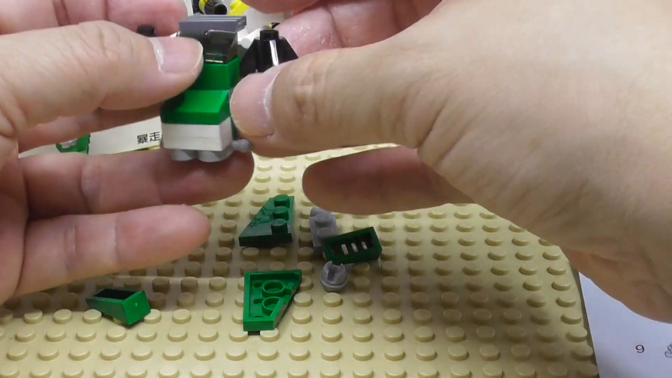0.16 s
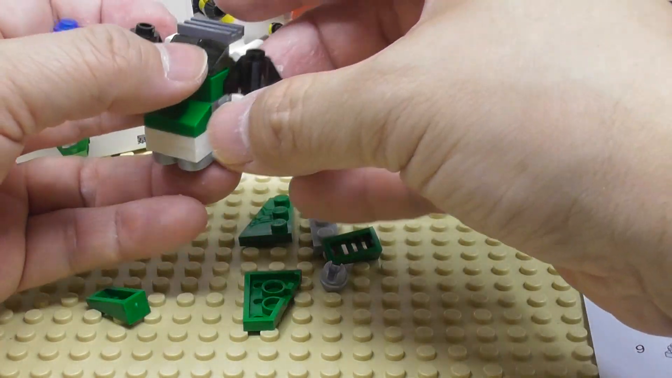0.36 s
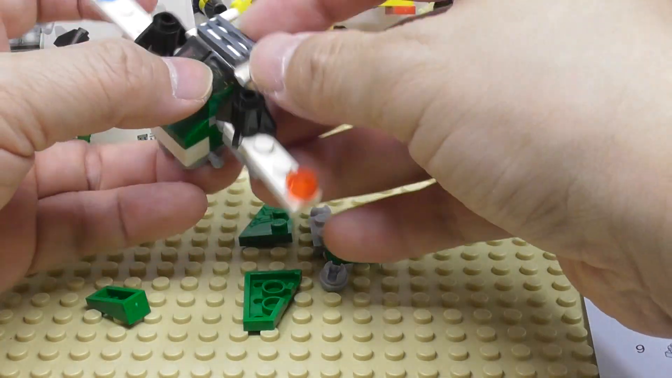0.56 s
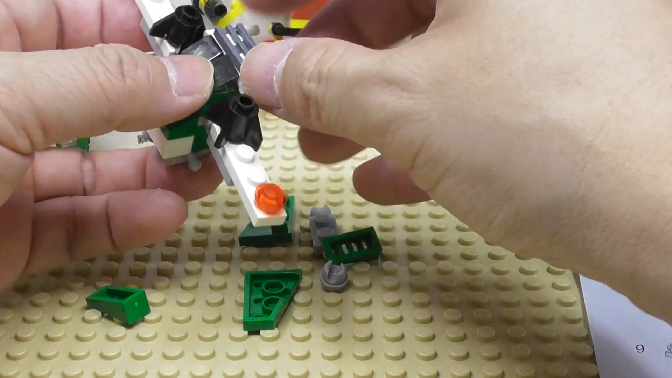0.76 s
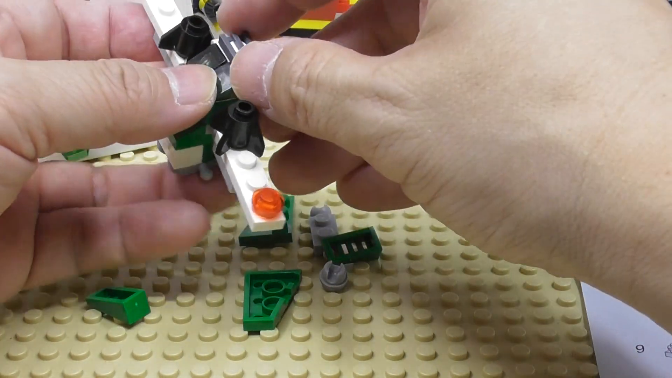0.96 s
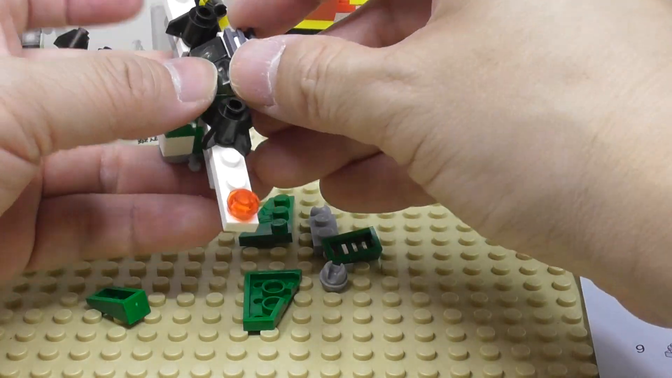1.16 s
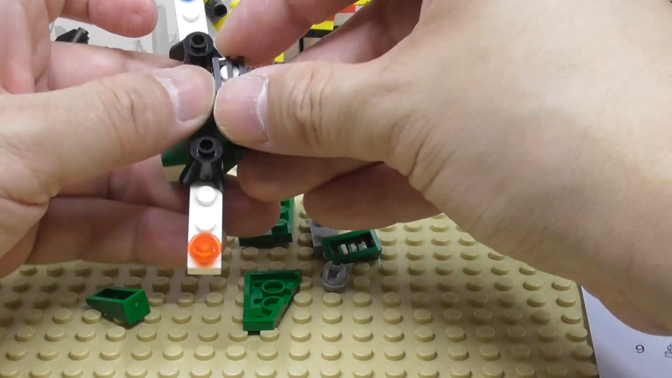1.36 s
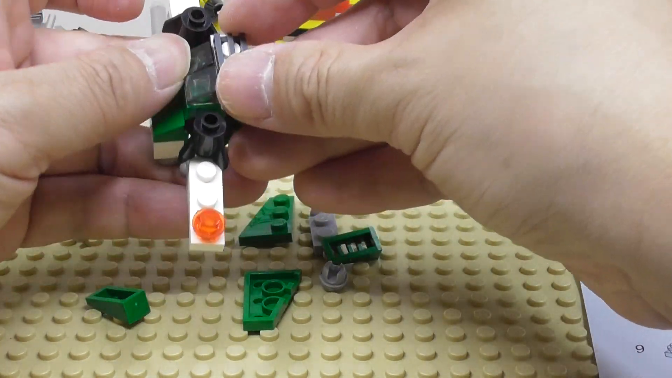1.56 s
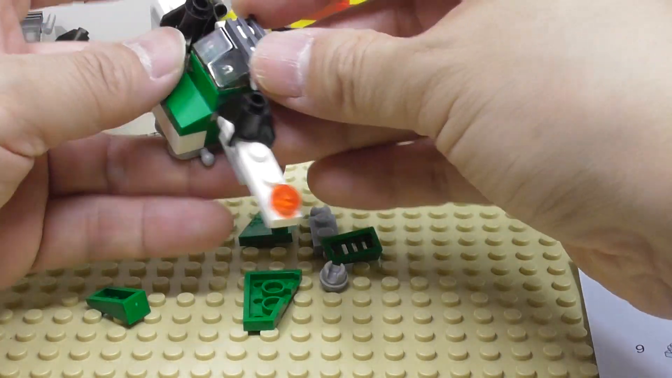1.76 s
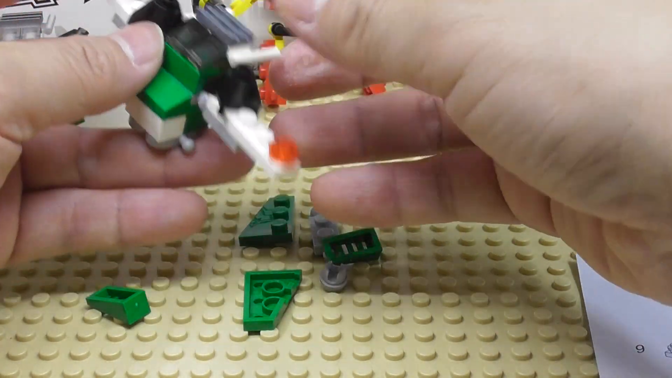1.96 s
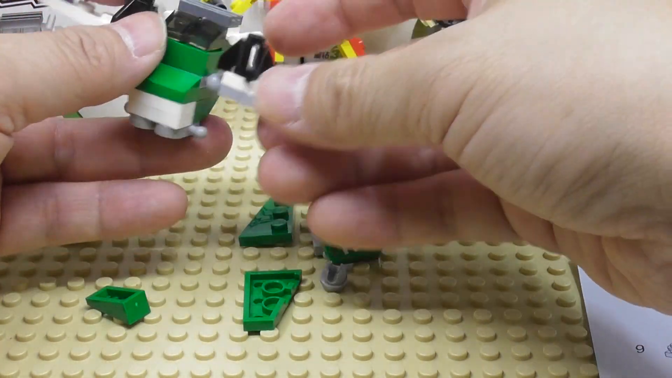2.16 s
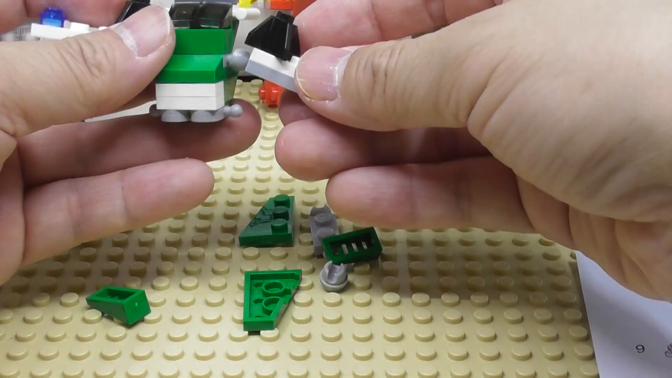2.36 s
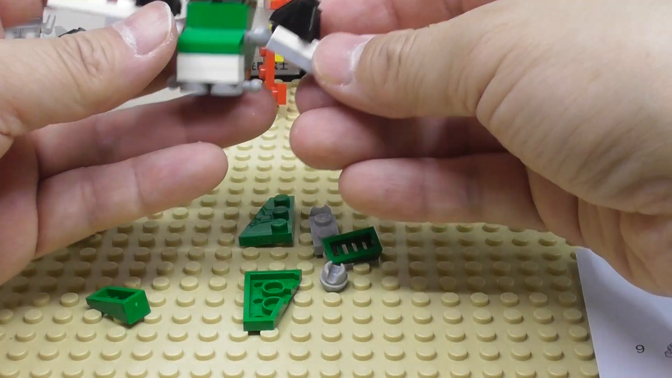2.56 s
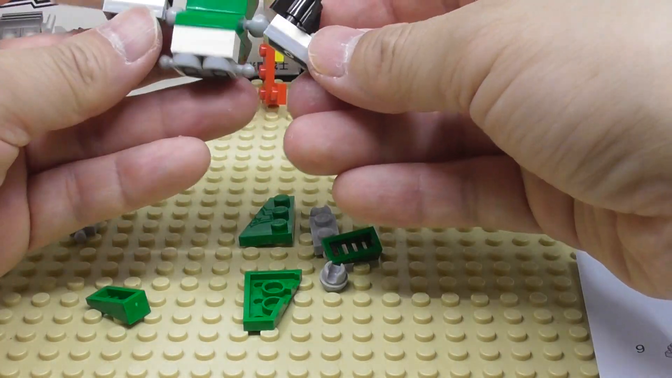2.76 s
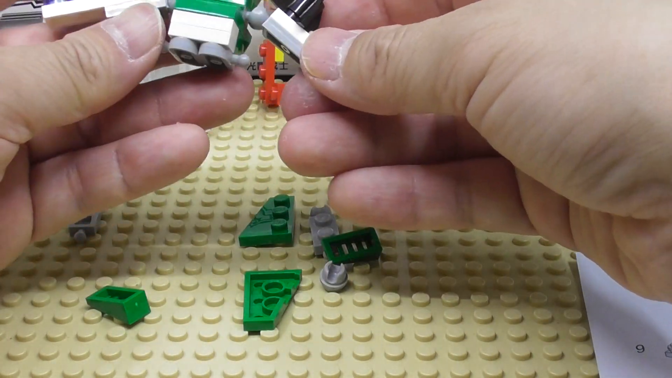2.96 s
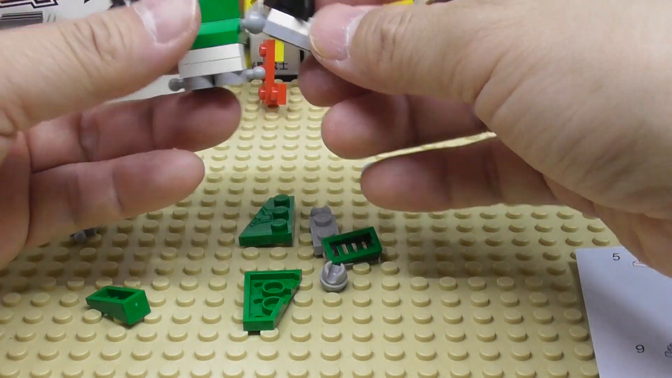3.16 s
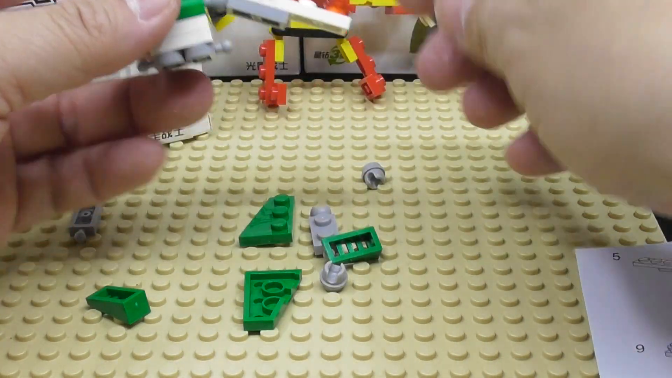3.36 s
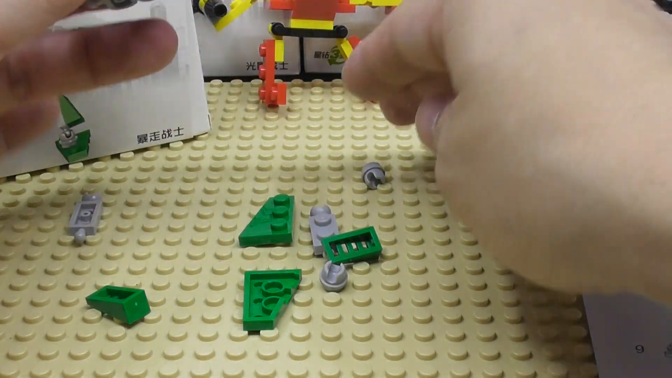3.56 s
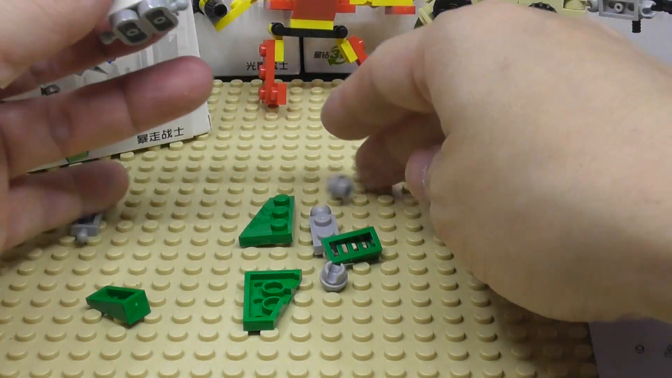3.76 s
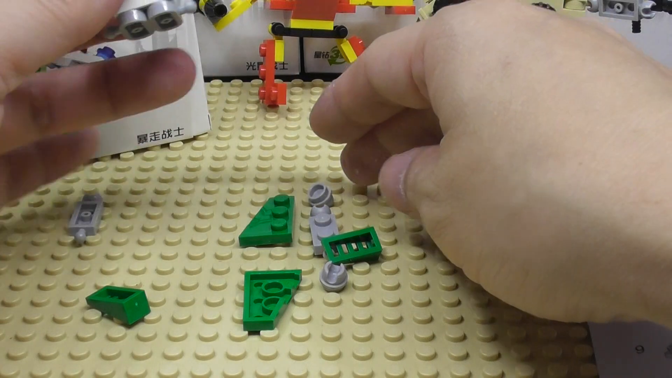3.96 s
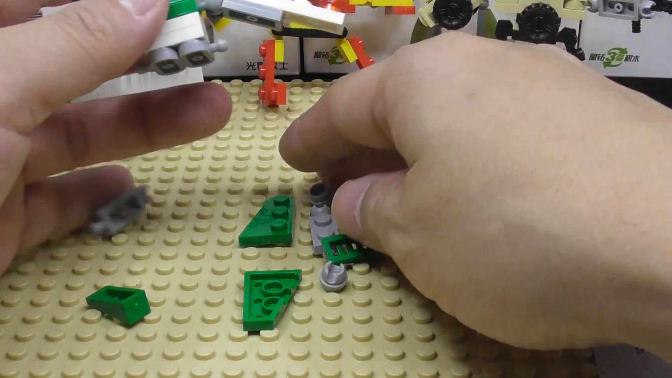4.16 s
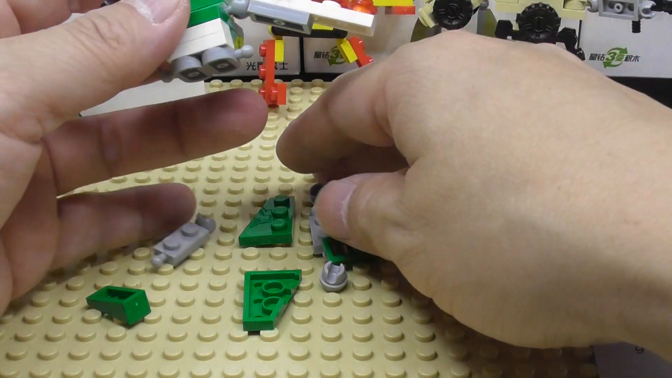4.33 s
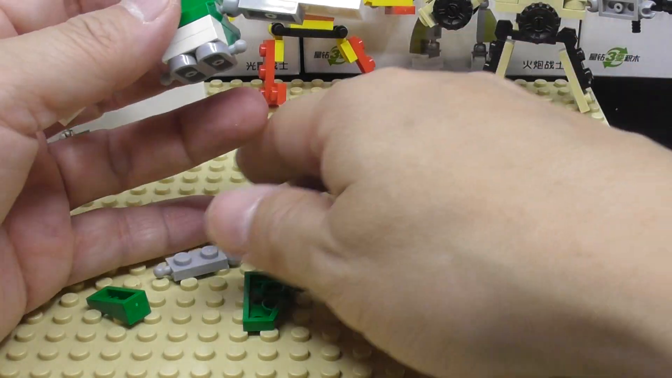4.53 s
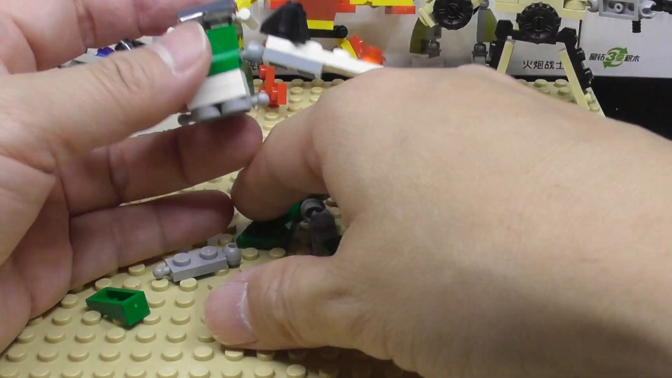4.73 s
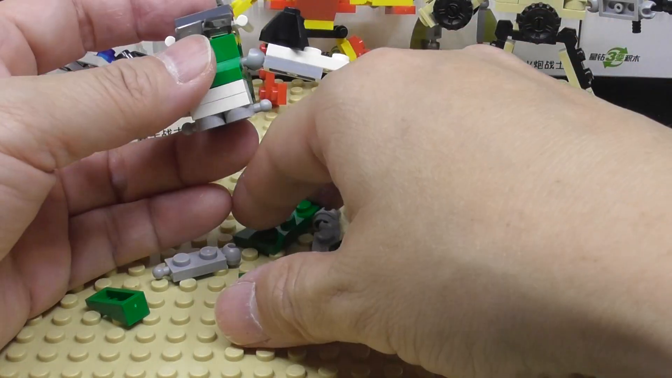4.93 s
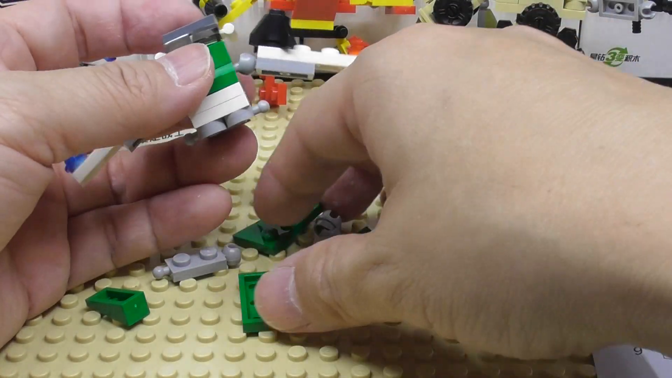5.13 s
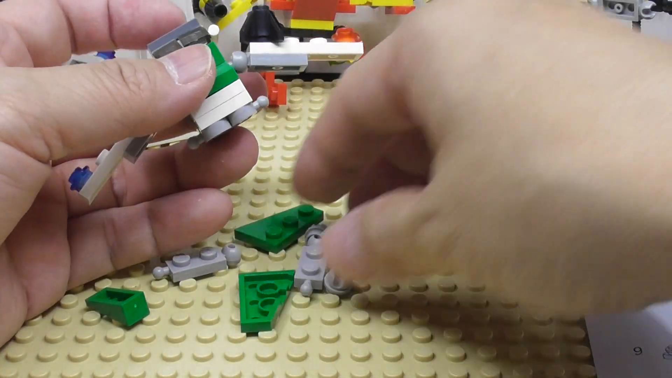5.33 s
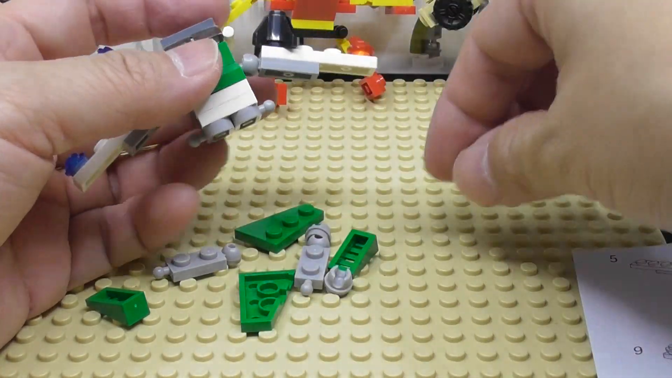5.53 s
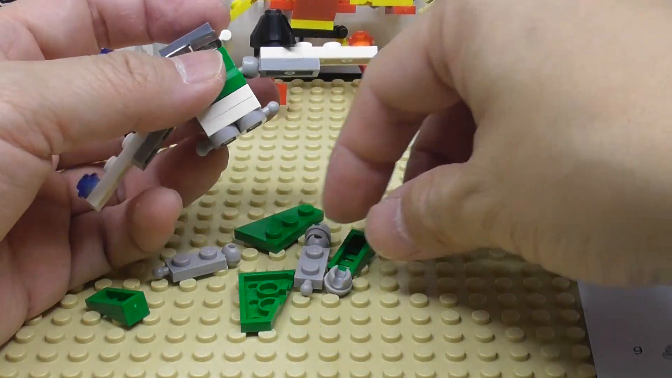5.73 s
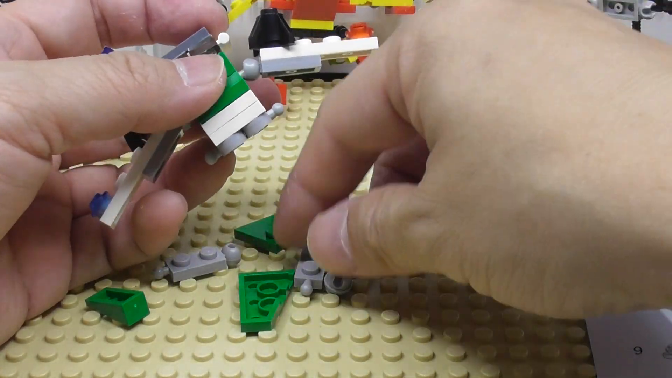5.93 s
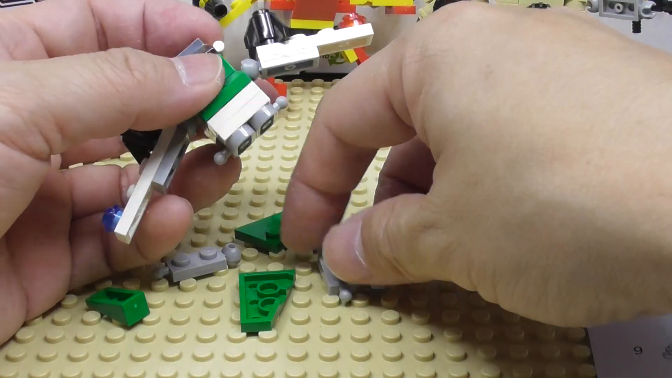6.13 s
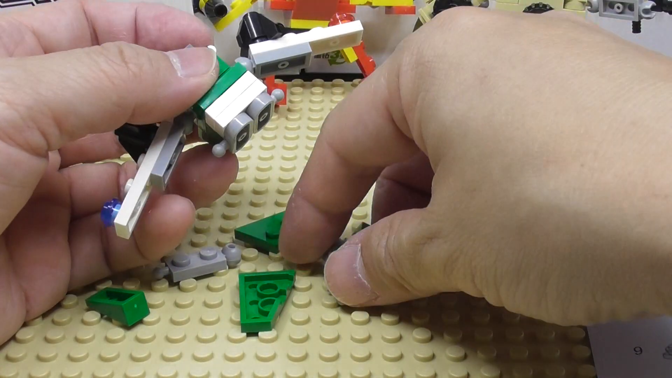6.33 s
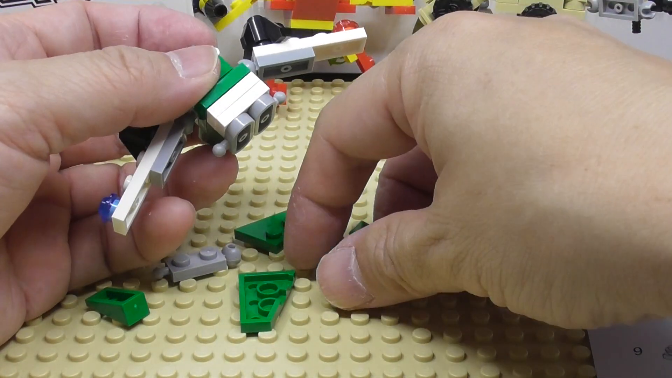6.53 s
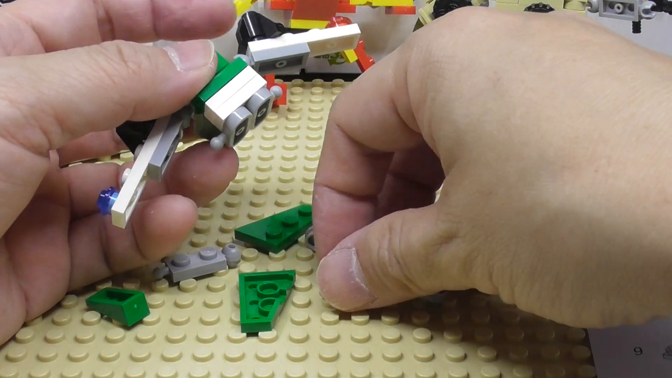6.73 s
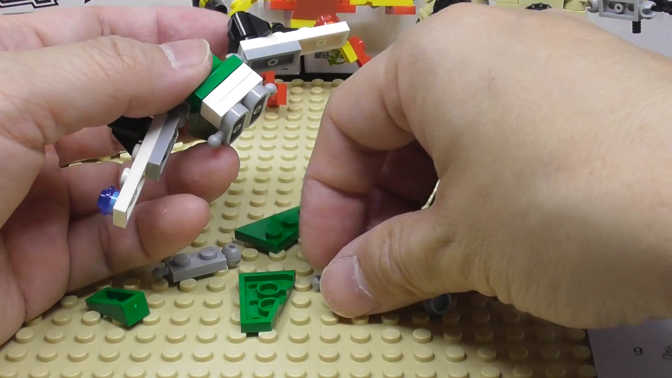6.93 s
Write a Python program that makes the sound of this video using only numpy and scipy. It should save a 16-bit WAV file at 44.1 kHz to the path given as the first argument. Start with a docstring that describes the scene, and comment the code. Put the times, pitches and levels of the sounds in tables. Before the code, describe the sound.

Close, dry plastic clatter in bursts after a quiet stretch of soft handling, with a low wavering fan hum and faint hiss behind.

```python
"""A quiet room, close to a studded base plate: small plastic bricks are handled, then pushed about on the plate.
Each contact is a sum of decaying modes of brick and plate, with noise tails scattered by objects nearby.
A hollow piece sings on three modes, hard knocks add low pressure pulses, and rustle is dense modal slips.
A fan hums steadily behind: wavering tones on its turn rate over shaped air noise, with a faint hiss."""
import sys
import numpy as np
from scipy import signal
from scipy.fft import rfft, irfft, next_fast_len
from scipy.io import wavfile

SR = 44100
rng = np.random.default_rng(int(sys.argv[2]) if len(sys.argv) > 2 else 0)


def waveform_to_disk(signal):
    """Save audio, clipped to [-1, 1], as 16-bit WAV at the path in sys.argv[1]."""
    frames = np.transpose(np.atleast_2d(signal))
    scaled = np.clip(frames, -1, 1) * 32767
    samples = np.round(scaled).astype(np.int16)
    wavfile.write(sys.argv[1], SR, samples)


N = 312669

# modes of a small brick and of the base plate: f/Hz, relative level/dB, t60/s
BRICK_MODES = [(6260, -6, 0.0024), (7240, 3, 0.0045), (8120, 1, 0.0062), (8960, -1.5, 0.0056),
               (9540, -1.5, 0.0041), (11300, -10, 0.0039), (12830, -11.5, 0.0038), (15000, -18, 0.0033)]
PLATE_MODES = [(1106, -6.5, 0.016), (1323, -6, 0.017), (1768, -4.5, 0.0062), (2172, -3, 0.0067),
               (2840, -9, 0.0052), (3330, -10.5, 0.0092), (3820, -4, 0.0072), (4370, -11, 0.005)]
# correlation of left and right: f/Hz, likeness (0-1)
LIKENESS = [(60, 0.48), (200, 0.92), (1300, 0.75), (2400, 0.99), (4400, 1), (8100, 0.99), (15000, 0.032)]


def amp(db):
    """Level: 20 dB is a factor of ten in pressure."""
    return 10 ** (np.asarray(db, float) / 20)


def rms_one(x):
    """Normalization: scale the mean power to 1."""
    return x / np.sqrt(np.mean(x ** 2) + 1e-20)


def at_hz(points, hz):
    """Interpolation on a logarithmic frequency axis."""
    table = np.array(points)
    return np.interp(np.log(hz + 1), np.log(table[:, 0]), table[:, 1])


def drift(rate_hz):
    """Slow random modulation: normal points of spread 1, joined by lines."""
    position = np.arange(N) / SR * rate_hz
    return np.interp(position, np.arange(400), rng.standard_normal(400))


def ring(clicks, hz, t60_s):
    """Damped resonance: a two-pole filter answers each unit click with a decaying sine."""
    radius = amp(-60 / (t60_s * SR))
    angle = 2 * np.pi * hz / SR
    poles = [1, -2 * radius * np.cos(angle), radius * radius]
    return signal.lfilter([0, np.sin(angle)], poles, clicks + 1e-18)   # the offset avoids denormal numbers


def pair(mid, side, alike):
    """Stereo correlation: the balance of sum and difference sets the likeness of the channels."""
    common, opposed = np.sqrt(1 + alike) * mid, np.sqrt(1 - alike) * side
    return np.array([common + opposed, common - opposed]) / np.sqrt(2)


def coloured(spectrum):
    """Spectral shaping: white noise weighted by frequency, in stereo, rms 1."""
    size = next_fast_len(N)
    hz = np.arange(size // 2 + 1) * SR / size
    mid, side = rfft(rng.standard_normal((2, size))) * amp(at_hz(spectrum, hz))
    stereo = irfft(pair(mid, side, at_hz(LIKENESS, hz)), size)
    return rms_one(stereo[:, :N])


def fan():
    """Rotating source: wavering harmonics of the turn rate over turbulent air noise, nearer the left."""
    # tones: multiple of the turn rate, rms level/dB before panning and waver, waver/dB
    fan_tones = [(1, -57.5, 0.37), (3, -57, 4.3), (4, -44.5, 0.18), (7, -58, 7.9), (12, -63, 1.5)]
    # air in the room's resonances: f/Hz, relative spectral level/dB
    air_spectrum = [(25, -37), (60, -20), (150, -10.5), (185, -6.5), (215, -17), (270, -20.5), (290, -6),
                    (340, -4), (400, -12), (800, -17.5), (880, -28), (1050, -20.5), (1300, -23.5),
                    (1400, -41)]
    turn_hz, air_db = 48.41, -43
    pan_db = 3.5   # left over right
    t = np.arange(N) / SR
    tones = np.zeros(N)
    for multiple, level_db, waver_db in fan_tones:
        sine = np.sqrt(2) * np.sin(2 * np.pi * (multiple * turn_hz * t + rng.random()))
        tones += amp(level_db + waver_db * drift(7.2)) * sine
    air = amp(air_db) * coloured([(10, -68)] + air_spectrum + [(2500, -77.0)])
    return (tones + air) * amp([[pan_db / 2], [-pan_db / 2]])


def hiss():
    """Broadband noise: a steady hiss, mostly above the fan's air noise in frequency."""
    # f/Hz, relative spectral level/dB
    hiss_spectrum = [(1300, -8.5), (1500, -4.5), (2500, -11), (4300, -18), (5300, -29), (6300, -24),
                     (7600, -18.5), (12000, -22.5), (16000, -23.5)]
    return amp(-57) * coloured(hiss_spectrum)


def strokes(t):
    """Amplitude envelope: each stroke swells, holds and dies away exponentially."""
    # finger strokes, later loose bricks over the plate: t/s, length/s, relative level/dB
    stroke_table = [(0, 0.076, -63.5), (0.125, 0.09, -60), (0.27, 0.48, -70.5), (0.889, 0.036, -61.5),
                    (1.006, 0.016, -58), (1.287, 0.14, -69), (1.463, 0.035, -61.5), (1.744, 0.031, -61),
                    (1.845, 0.034, -55), (2.07, 0.05, -64), (2.185, 0.022, -58), (2.835, 0.025, -71),
                    (3.033, 0.042, -73), (3.225, 0.16, -70), (3.735, 0.26, -62.5), (4.16, 0.16, -57),
                    (4.378, 0.16, -50.5), (4.679, 0.37, -60.5), (5.141, 0.18, -54.5), (6.032, 0.15, -56),
                    (6.678, 0.022, -47.5), (6.845, 0.027, -46)]
    attack_s, release_s = 0.0029, 0.022
    envelope = amp(-78.5)   # hands are never quite still
    for s, length_s, level_db in stroke_table:
        swell = np.clip((t - s) / attack_s + 1, 0, 1)
        decay = np.exp(-np.maximum(t - s - length_s, 0) / release_s)
        envelope = envelope + amp(level_db) * swell * decay
    return envelope


def slips(times, levels_db, modes, patchy_db):
    """Stick-slip excitation: each small slip drives every mode with its own strength and sign, rms 1."""
    at, out = (times * SR).astype(int), np.zeros((2, N))
    for hz, mode_db, t60_s in modes:
        clicks = np.zeros((2, N))
        push, side = rng.standard_normal((2, len(at))) * amp(levels_db + mode_db)
        clicks[:, at] = pair(push, side, at_hz(LIKENESS, hz))
        # the grip shifts, and the colour with it
        out += amp(patchy_db * drift(12)) * ring(clicks, hz, t60_s)
    return rms_one(out)


def rustle():
    """Friction: skin slips finely on bricks; later loose bricks scrape over studs in more uneven grains."""
    on_plate_s = 3.7   # from here on the plate sounds too
    skin_wobble_db, slide_wobble_db = 1, 1.5
    bright = 0.33   # radius of the double zero that lifts the treble of the brick slips
    t = np.arange(N) / SR
    times = rng.random(8000) * (N - 1) / SR
    later = times > on_plate_s
    sizes_db = np.where(later, 3.2, 1.6) * np.minimum(rng.exponential(1, 8000), 4)
    sizes_db -= np.where(later, 6.0, 0)
    on_bricks = slips(times, sizes_db, BRICK_MODES, patchy_db=5.5)
    on_bricks = rms_one(signal.lfilter([1, -2 * bright, bright ** 2], [1], on_bricks))
    on_plate = amp(12.5) * (t > on_plate_s) * slips(times, sizes_db, PLATE_MODES, patchy_db=2.5)
    wobble_db = np.where(t > on_plate_s, slide_wobble_db, skin_wobble_db) * drift(30)
    return strokes(t) * amp(wobble_db) * (on_bricks + on_plate)


def knocks():
    """Pressure pulse: each hard knock pushes the microphone with one smooth negative half-cycle."""
    # t/s, peak level/dB, length/ms
    knock_table = [(3.8138, -2, 1.24), (4.2025, -2, 1.08)]
    out = np.zeros(N)
    for s, level_db, length_ms in knock_table:
        phase = (np.arange(N) / SR - s) / (length_ms / 1000)
        out -= amp(level_db) * np.sin(np.pi * np.clip(phase, 0, 1)) ** 2
    return out


def bounced(s, level_db):
    """Repeated impact: an edge grazes, the blow lands, then the rocking brick touches twice more, losing energy."""
    graze_db = -13   # against the blow
    loss_db, loss_spread_db = 10.5, 2.0   # at each further touch
    lead_s = rng.uniform(0.00084, 0.0033, len(s))
    gaps_s = np.cumsum(rng.uniform(0.0037, 0.0083, (len(s), 2)), axis=1)
    losses_db = np.cumsum(loss_db + loss_spread_db * rng.standard_normal((len(s), 2)), axis=1)
    times = np.c_[s - lead_s, s, s[:, None] + gaps_s]
    levels_db = np.c_[level_db + graze_db, level_db, level_db[:, None] - losses_db]
    return times.ravel(), levels_db.ravel()


def blows(times, peaks_db, modes, detune, echo_db, give_s=0.00006):
    """Modal impact: unlike pieces hit at unlike spots vary in mode strength, tuning, sign and scatter."""
    strike_spread_db = 2.0   # how unevenly a blow feeds the modes
    echo_t60_s = 0.047   # scatter from table, hands and boxes close by
    t = np.arange(SR // 16) / SR
    out = np.zeros((2, N + len(t)))
    hz, mode_db, t60_s = np.transpose(modes)[:, :, None]
    alike = at_hz(LIKENESS, hz)
    chance = rng.standard_normal((len(times), 3, len(modes), 1))
    contact = 1 - np.exp(-t / give_s)   # plastic gives a little, so the force takes a moment to build
    dying = amp(-60 * t / echo_t60_s)
    tails = rng.standard_normal((len(times), 1, len(t))) * dying
    tails *= amp(echo_db) / np.sqrt(np.sum(dying ** 2))
    for s, peak_db, (strength, tuning, sign), tail in zip(times, peaks_db, chance, tails):
        decay = amp(mode_db + strike_spread_db * strength - 60 * t / t60_s) * np.sign(sign)
        rings = decay * contact * np.exp(2j * np.pi * hz * (1 + detune * tuning) * t)
        # where likeness is below 1, the right channel leads a little in phase and is a little weaker
        both = pair(rings.imag, 0.28 * rings.imag - rings.real, alike).sum(axis=1)
        both = amp(peak_db) * both / np.abs(both.mean(axis=0)).max()
        echo = signal.fftconvolve(both, tail, axes=1)[:, :len(t)]
        start = int(s * SR)
        out[:, start:start + len(t)] += both + echo
    return out[:, :N]


def contacts():
    """Coupled impact: a contact cracks the brick, drums the plate and bounces; a tumbling hollow piece sings."""
    # brick contacts: t/s, brick peak level/dB before echo and filtering, plate level/dB against the brick
    contact_table = [(0.047, -45.5, 11.5), (0.91, -33, -15), (1.517, -38, 2.5), (1.5264, -20, -8.5),
                     (3.743, -24, -0.5), (3.7605, -29.5, 8), (3.7863, -31, 3), (3.808, -16, -7),
                     (3.813, -8, -5.5), (3.844, -15.5, -3.5), (3.8718, -22.5, 3.5), (3.8827, -21, -1.5),
                     (3.8917, -23.5, -2), (3.9, -30, -2), (3.912, -30, -1), (3.946, -33.5, 6),
                     (3.9842, -29.5, 4.5), (4.1416, -26.5, 5), (4.165, -11.5, 0), (4.172, -18.5, 2),
                     (4.1951, -19.5, 5.5), (4.2018, -12.5, 2), (4.2328, -16.5, -4), (4.239, -22.5, 7),
                     (4.2582, -26.5, -1), (4.2714, -31, 10), (4.2741, -6.5, -6), (4.298, -30, 6),
                     (4.312, -15, -2), (4.344, -16, 0), (4.3535, -19, 1.5), (4.358, -21, 7),
                     (4.379, -14.5, -0.5), (4.384, -28, 5), (4.396, -34, 11), (4.4228, -34, 6.5),
                     (4.4314, -32.5, 12), (4.4505, -21, 2), (4.455, -27, 4.5), (4.466, -38, 10),
                     (4.478, -36, 16), (4.49, -25.5, 7.5), (4.5032, -29, 10), (4.5177, -27.5, 6),
                     (4.526, -29, 5), (4.588, -25, 2), (4.6937, -38.5, 8.5), (4.7141, -38.5, 12.5),
                     (4.744, -30, 5.5), (4.7528, -27.5, 2), (4.759, -31, 6.5), (4.827, -36, 9),
                     (4.8349, -22.5, 3.5), (4.84, -22.5, 4.5), (4.903, -28.5, 2.5), (4.925, -31.5, 5),
                     (4.9847, -37.5, 8), (5.175, -35, -8), (5.229, -36, 14), (5.2384, -18, -3),
                     (5.247, -7.5, -6), (5.262, -15, -5), (5.2746, -17, -11), (5.3044, -20.5, -0.5),
                     (5.316, -25.5, 2.5), (6.0007, -29, 5.5), (6.0407, -31, -17), (6.0612, -36, -14),
                     (6.073, -24, -8), (6.078, -15, -10), (6.0856, -11.5, -7), (6.113, -26, -1),
                     (6.13, -22.5, 3), (6.137, -28, 4), (6.163, -27, 5), (6.173, -29.5, -2),
                     (6.199, -41, 5), (6.2242, -32.5, 9), (6.241, -38.5, 10.5), (6.262, -20, 7),
                     (6.5664, -37, 7), (6.61, -47, 17.5), (6.6356, -24.5, 2.5), (6.666, -26, 5),
                     (6.682, -18.5, -16), (6.7006, -26.5, 5), (6.7083, -13, -5), (6.7165, -17, 1.5),
                     (6.7254, -16, -8), (6.767, -18, 1.5), (6.7714, -15.5, -8.5), (6.781, -18, -7),
                     (6.7919, -25, 0), (6.803, -30, 3.5), (6.821, -38, 7), (6.849, -13, -2.5),
                     (6.8636, -12, -3.5), (6.8748, -21, 6.5), (6.893, -31, 0), (6.964, -40, 8.5),
                     (7.0339, -39, 14), (7.0498, -26, 4.5)]
    # touches of the tumbling hollow piece: t/s, peak level/dB before echo and filtering
    tumble_table = [(4.197, -22), (4.202, -20), (4.276, -19.5), (4.298, -23), (4.313, -36), (4.346, -30),
                    (4.3531, -14), (4.3848, -22), (4.398, -33), (4.434, -26), (4.4563, -15.5),
                    (4.4665, -21), (4.488, -26), (4.505, -20.5), (4.519, -26), (4.841, -25.5), (5.146, -42)]
    # modes of the hollow piece: f/Hz, relative level/dB, t60/s
    hollow_modes = [(1107, -4.5, 0.028), (7200, 8.5, 0.026), (13300, -16.5, 0.025)]
    s, brick_db, plate_db = np.transpose(contact_table)
    times, brick_db = bounced(s, brick_db)
    plate_db = brick_db + np.repeat(plate_db, 4)   # four touches to a contact
    tumble_s, tumble_db = bounced(*np.transpose(tumble_table))
    bricks = blows(times, brick_db, BRICK_MODES, detune=0.057, echo_db=-5.5)
    plate = blows(times, plate_db, PLATE_MODES, detune=0.035, echo_db=-5.5, give_s=0.00014)
    hollow = blows(tumble_s, tumble_db, hollow_modes, detune=0.0023, echo_db=-7.5)
    return bricks + plate + hollow


def scene():
    """Superposition: bricks in the middle, close; fan and hiss behind."""
    background = fan() + hiss()
    bricks = rustle() + contacts()
    # bodies this small radiate no bass
    bricks = signal.sosfilt(signal.butter(4, 750, "high", fs=SR, output="sos"), bricks)
    # the microphone housing has a dip in the lower treble
    bricks = bricks - 0.45 * signal.lfilter(*signal.iirpeak(5300.0, 3.0, fs=SR), bricks)
    return background + knocks() + bricks


def record(dry):
    """Overload and band limit: the hardest peaks clip, and a steep low-pass cuts the top."""
    clipped = np.clip(dry, -.9, .9)
    low_pass = signal.ellip(12, .5, 60, 15850, fs=SR, output="sos")   # ripple/dB, stopband/dB, cutoff f/Hz
    return signal.sosfilt(low_pass, clipped)


dry = scene()
out = record(dry)
waveform_to_disk(out)
```